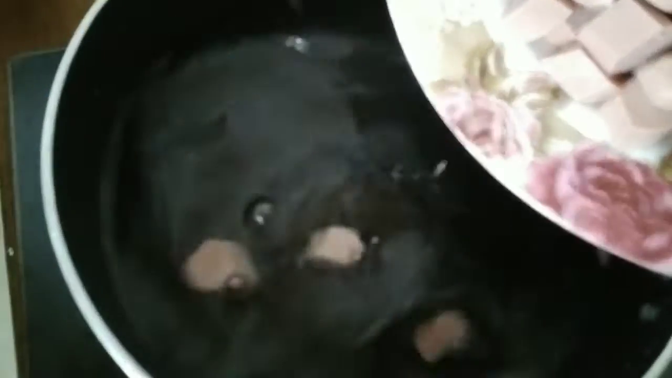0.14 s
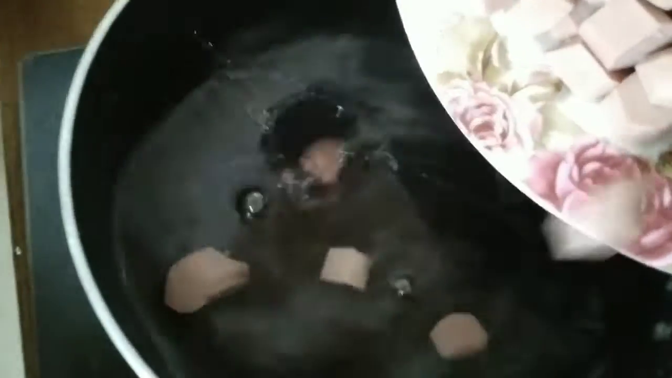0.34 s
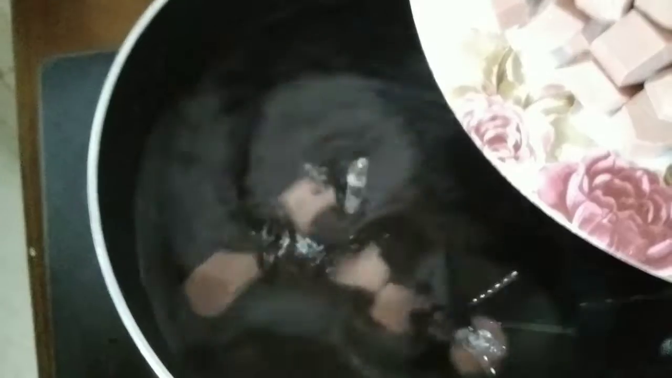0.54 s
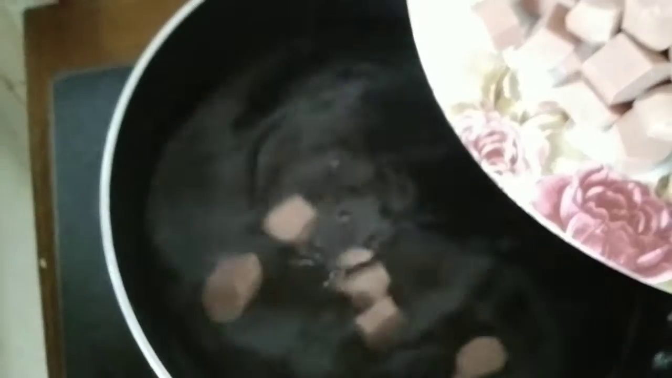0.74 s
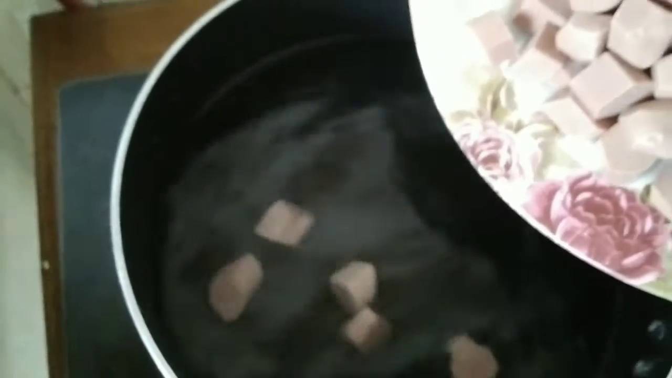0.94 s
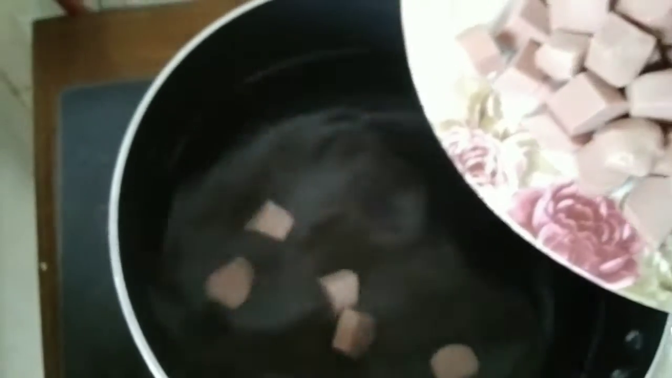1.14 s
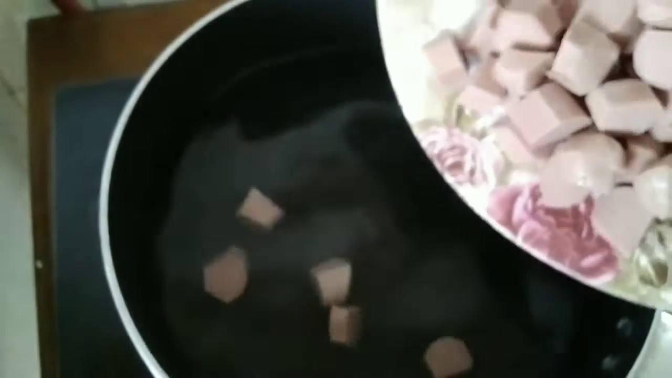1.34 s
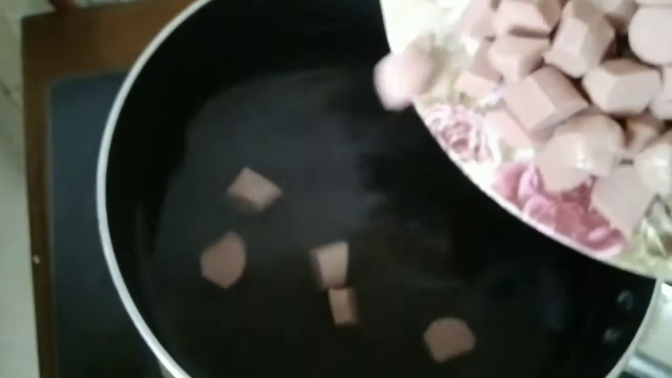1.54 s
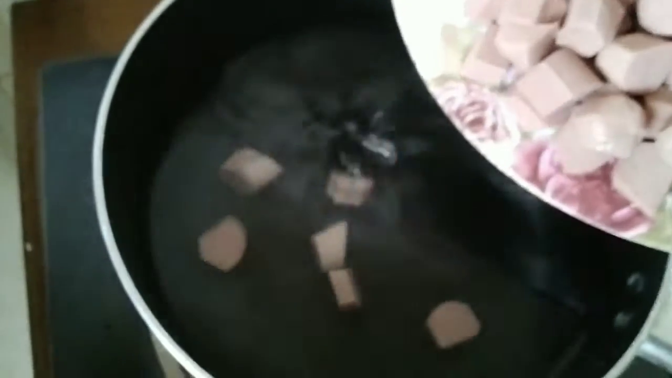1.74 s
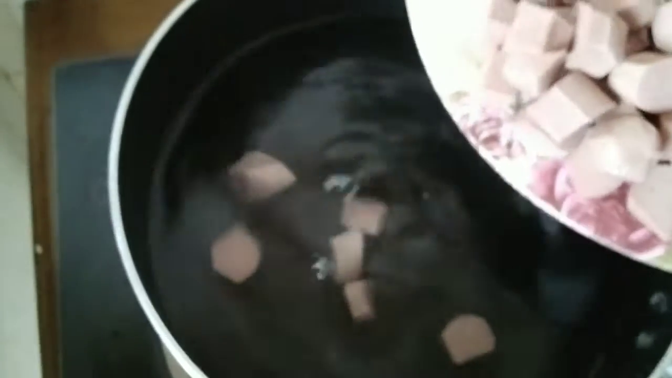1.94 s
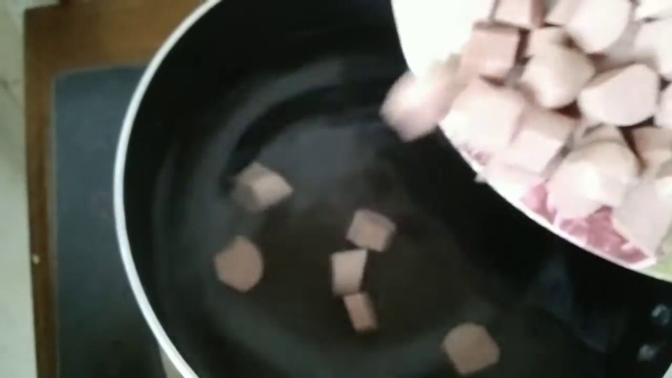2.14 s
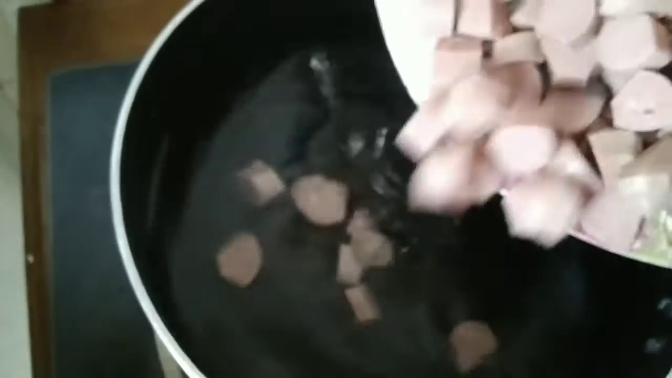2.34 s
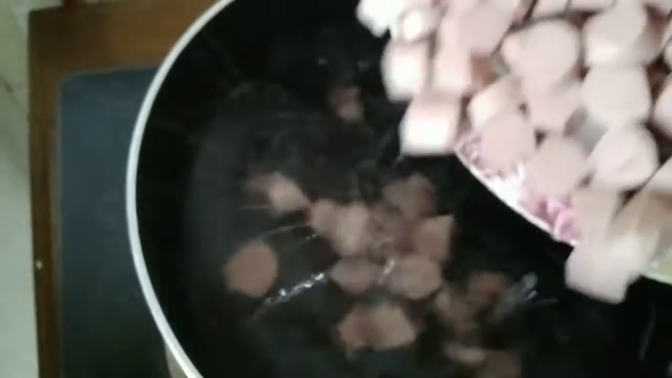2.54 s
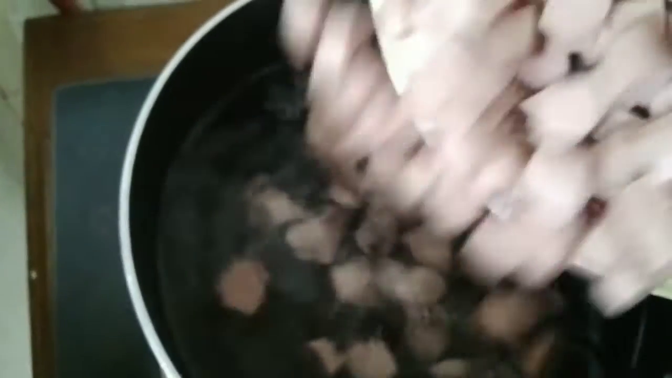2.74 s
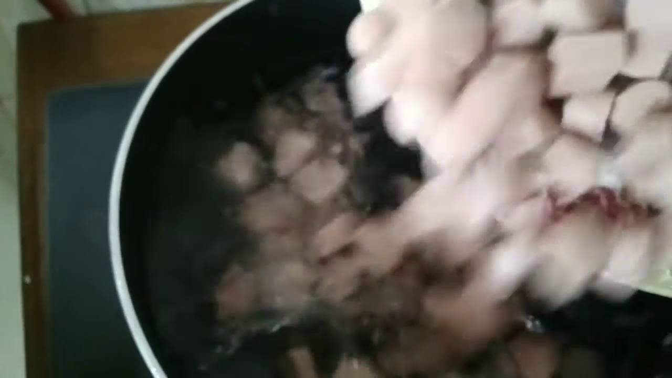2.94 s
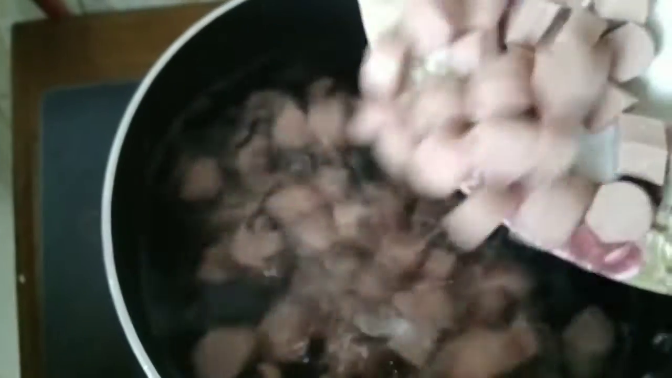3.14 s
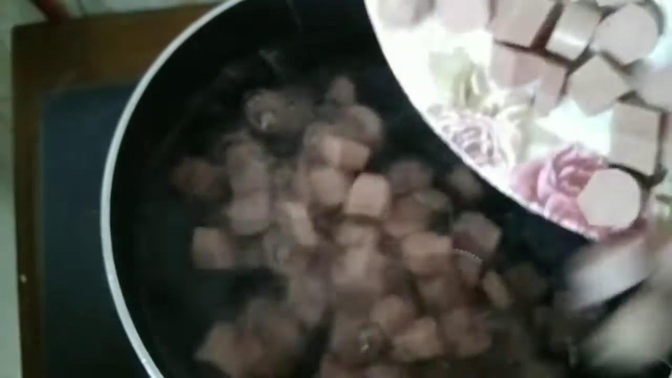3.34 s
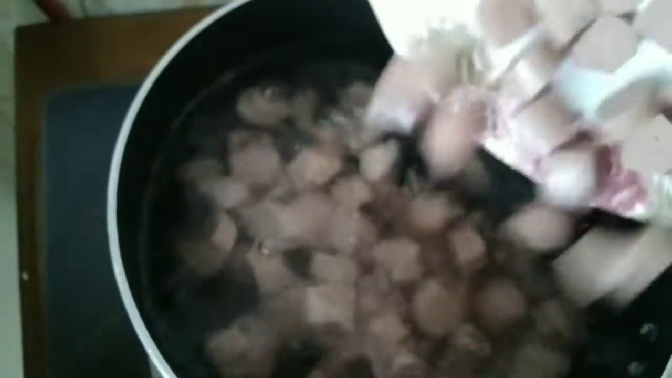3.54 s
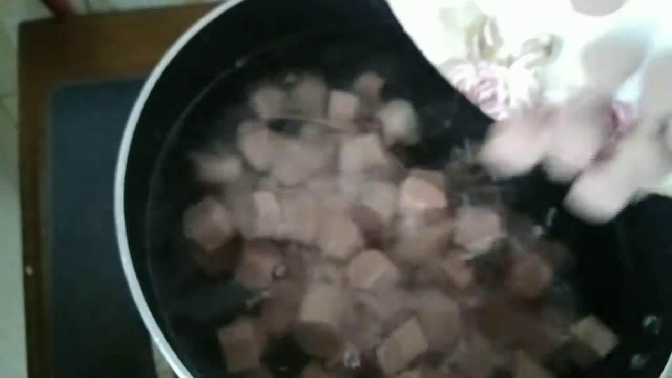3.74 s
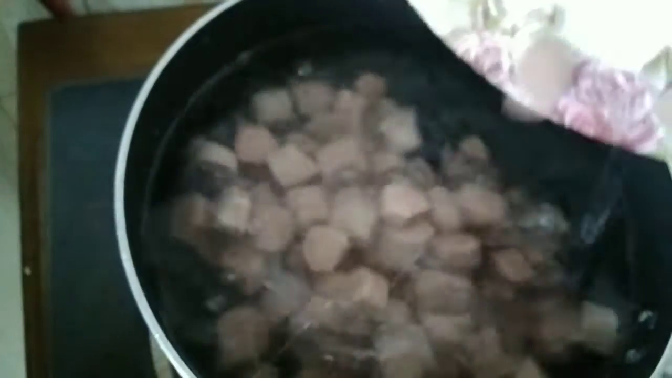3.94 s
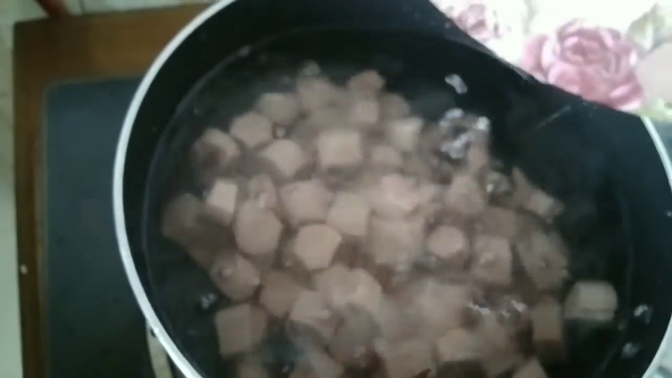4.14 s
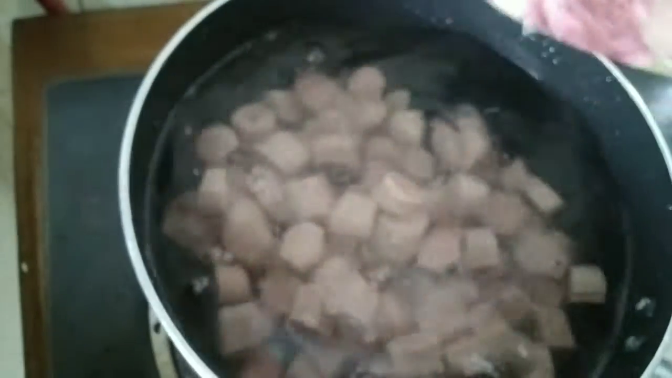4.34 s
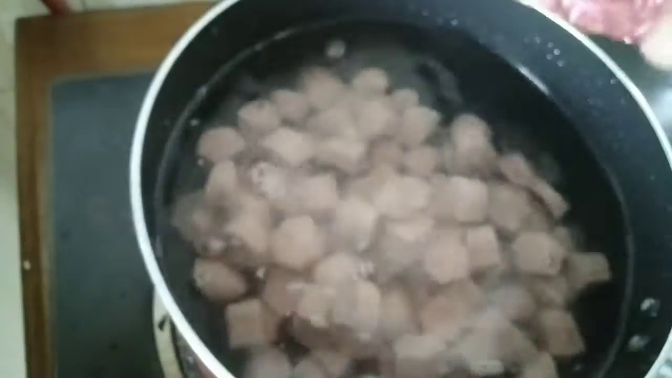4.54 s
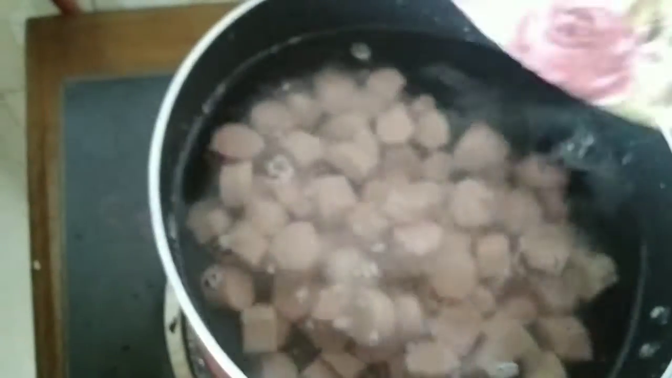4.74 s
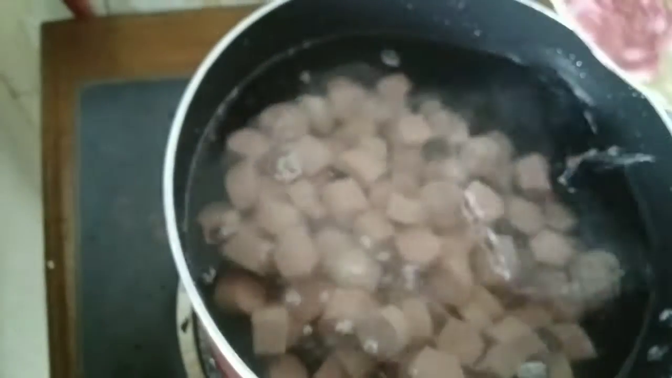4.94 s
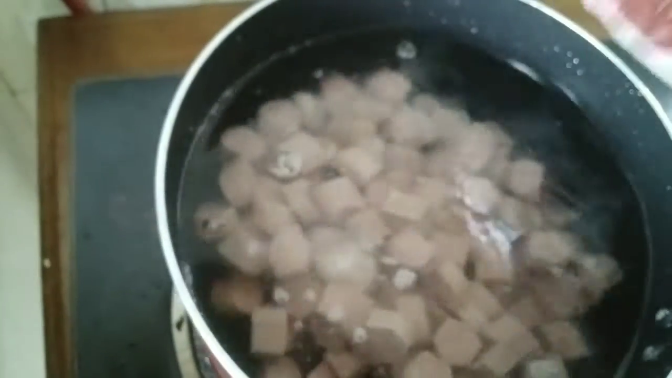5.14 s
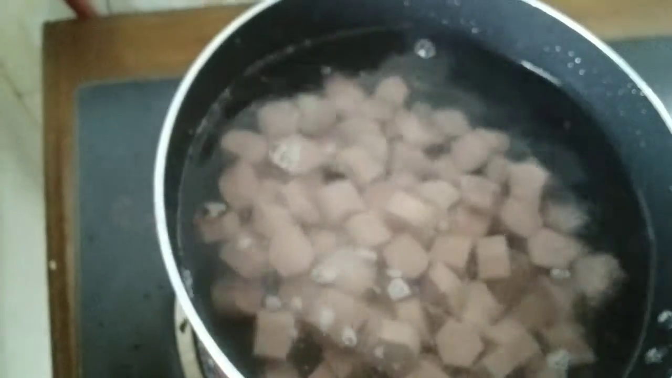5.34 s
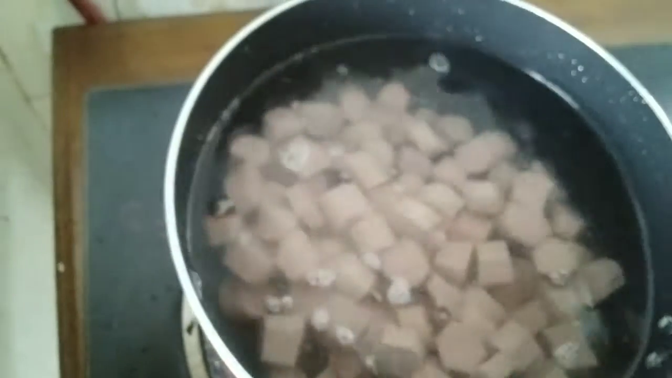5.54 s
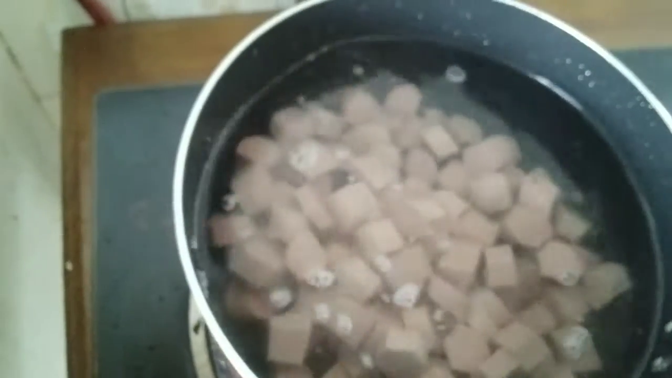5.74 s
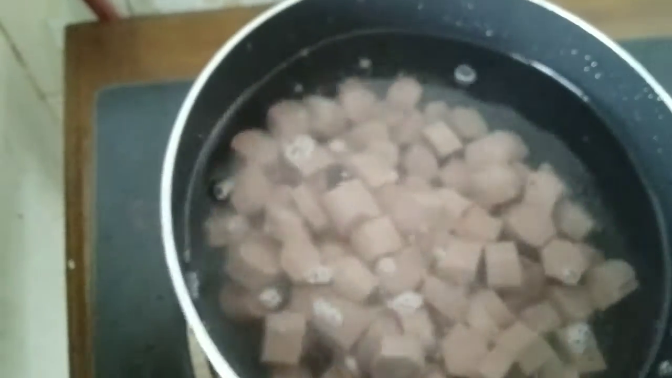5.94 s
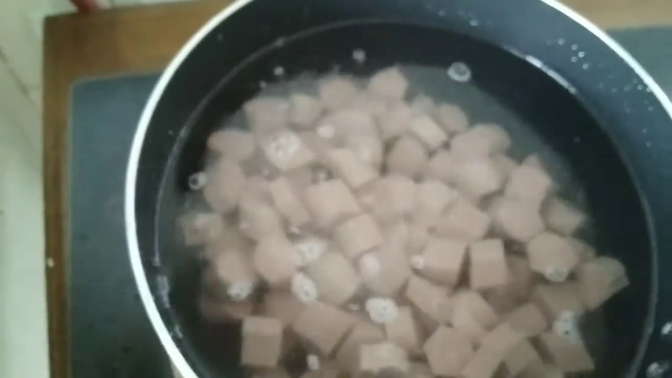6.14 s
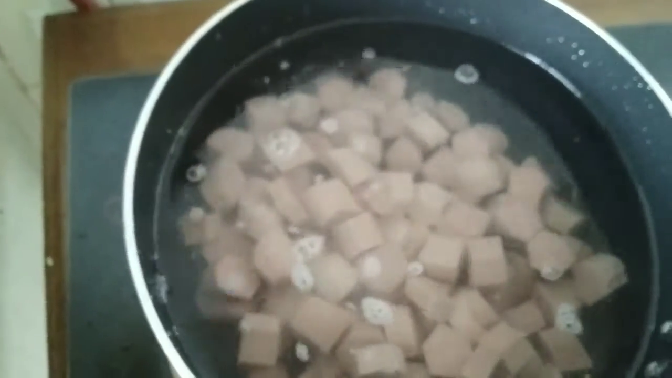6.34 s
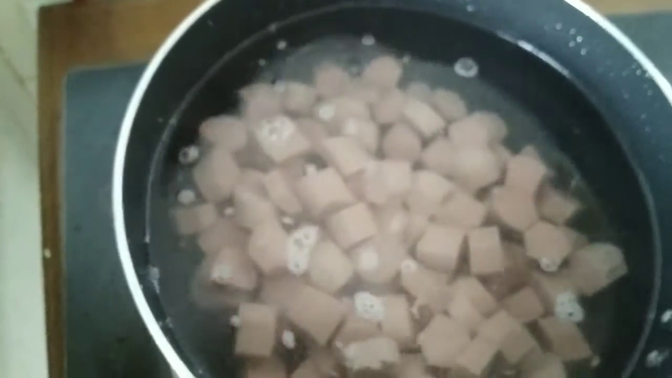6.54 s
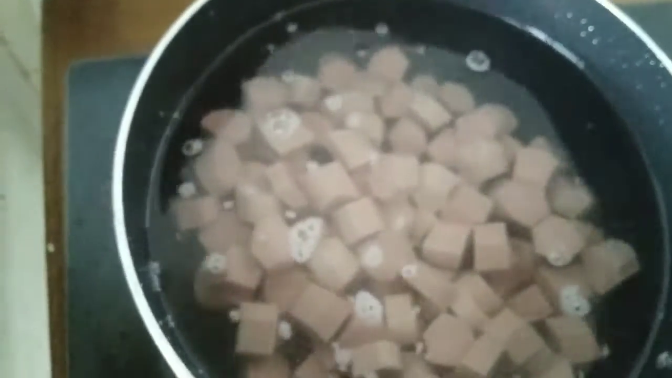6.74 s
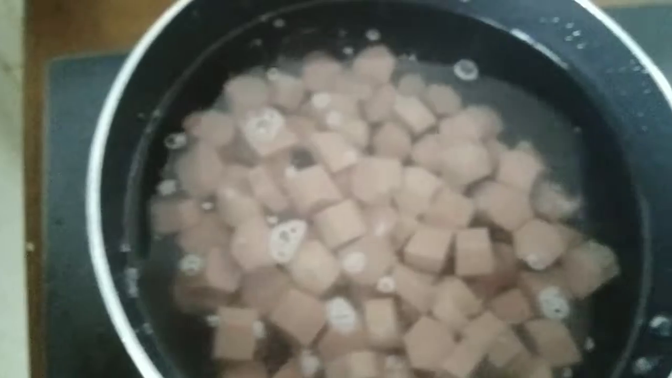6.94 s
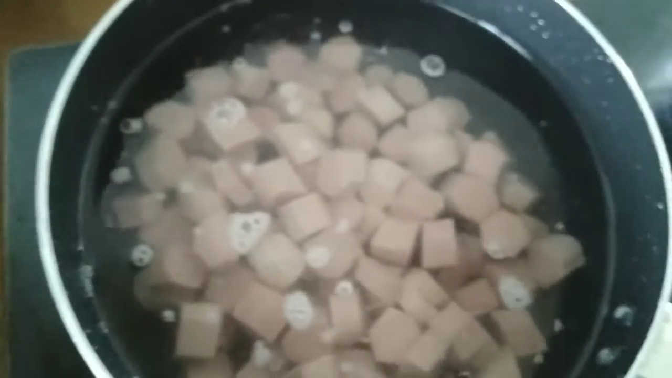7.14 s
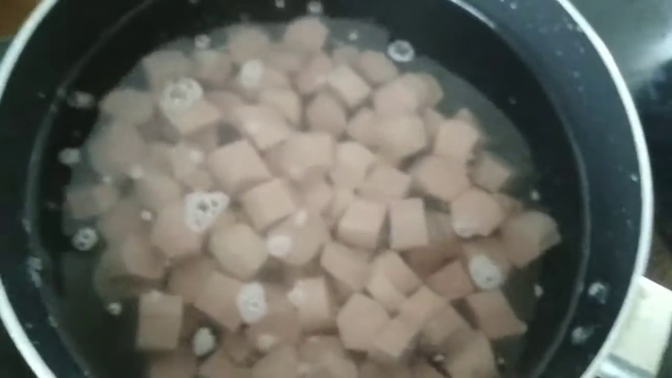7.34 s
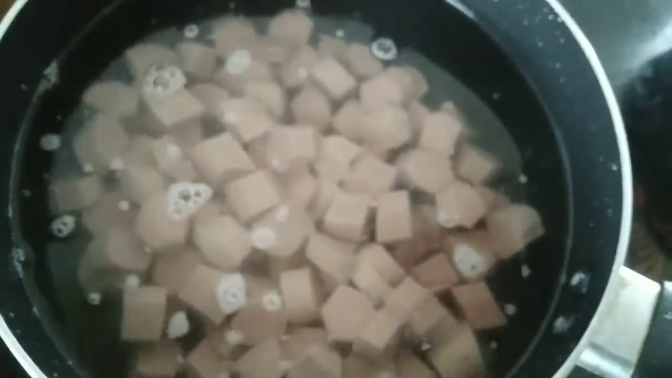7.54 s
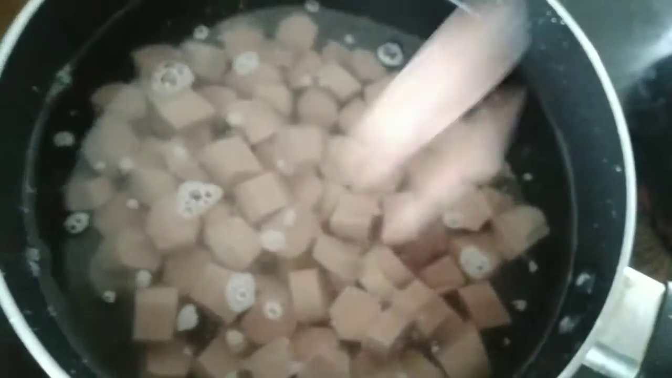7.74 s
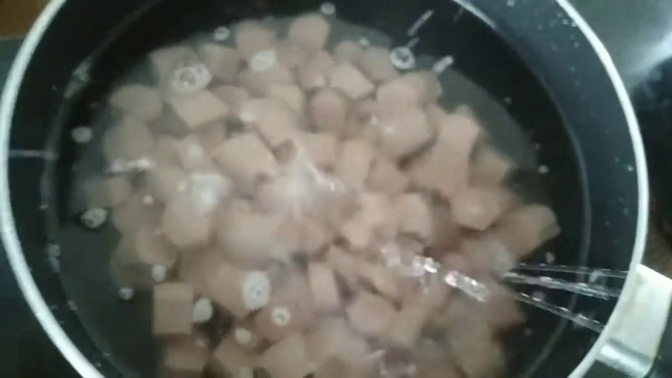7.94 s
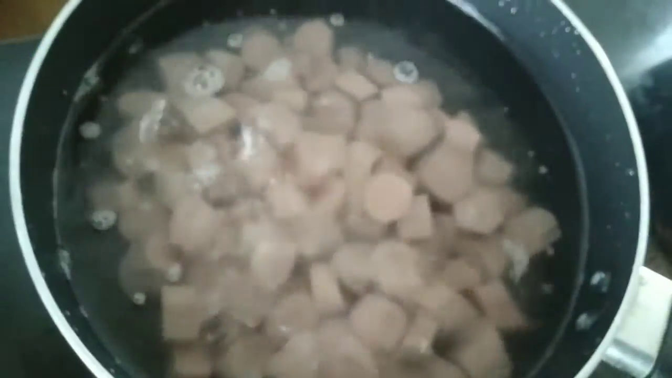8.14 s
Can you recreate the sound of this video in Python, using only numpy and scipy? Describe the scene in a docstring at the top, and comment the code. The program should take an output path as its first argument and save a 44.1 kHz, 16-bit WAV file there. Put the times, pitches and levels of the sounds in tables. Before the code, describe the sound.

In a small, hard kitchen, close to a phone, a few pieces of sausage slap into a pot of water with short plops. Then a heap tumbles in with dense splashes, fizzing spray, gurgles, low pot bumps and quick plate scrapes. After a pause the plate lands with a loud ringing, rattling clatter; light rustles, small drops and laps follow over faint hum.

```python
"""Pieces of sausage slide off a plate into a pot of water in a small hard kitchen, close to a phone.
First a few pieces slap the water, as bursts of noise, and trapped air rings as short rising tones.
From about 2 s a heap slides in: dense slaps, ticking spray, gurgles, bumps and scraping strokes.
At 5.5 s the plate is set down with a ringing clatter; a few last drops and small waves follow.
The room rings on after hits, over rustles, squeaks, hoots and hum; the phone turns down steady noise."""
import sys
import numpy as np
from scipy import signal
from scipy.fft import rfft, irfft
from scipy.io import wavfile
from scipy.ndimage import uniform_filter1d, minimum_filter1d

SR = 44100
rng = np.random.default_rng(int(sys.argv[2]) if len(sys.argv) > 2 else 0)


def waveform_to_disk(signal):
    """Save audio, clipped to [-1, 1], as 16-bit WAV at the path in sys.argv[1]."""
    frames = np.transpose(np.atleast_2d(signal))
    scaled = np.clip(frames, -1, 1) * 32767
    samples = np.round(scaled).astype(np.int16)
    wavfile.write(sys.argv[1], SR, samples)


N = 365148  # length in samples

# In all tables, t60 is the time in which a sound dies away by 60 dB.
# steady room noise: (frequency [Hz], relative level [dB])
FLOOR_SPECTRUM = [(15, -33), (25, -28), (59, 1), (183, 1.5), (221, -10.5), (305, -6.5), (368, -11.5),
                  (399, -9), (804, -10.5), (997, -14), (1710, -18), (2850, -27), (5430, -30.5), (8810, -26),
                  (15500, -40.5)]
FLOOR_DB = -63  # level while the suppressor is closed
# mains hum: two tones that beat; levels while the suppressor is closed, the second relative to the first
HUM_HZ, HUM_DB, HUM_BEAT_HZ, HUM_LOUDEST_S, HUM_SECOND_DB = 50.3, -73, .49, 3.95, -5
# the hum swells once: (time [s], level with the suppressor closed [dB], hold [s])
HUM_SWELL = [(1.5, -63, 0.08)]
# the room's tail by band: (frequency [Hz], relative level [dB], t60 [s])
ROOM_BANDS = [(100, -4, 0.57), (430, -6.5, 0.69), (1200, -12.5, .55), (2620, -3.5, 0.62), (4000, -8, 0.4),
              (5090, -13, 0.62), (8500, -4.5, 0.27), (11300, -8.5, 0.36), (15270, -4.5, .3)]
# tone colour of the water sound sent into the room: (frequency [Hz], gain [dB])
WATER_TO_ROOM = [(1800, -3.5), (2600, -10.5), (4700, -7), (5200, 3), (11000, 2.5), (15000, -9)]
RING_IN_ROOM_DB = -8.5  # the ring carries less into the room than the crack
# faint hoots, a narrow wavering band:
# (time [s], level [dB], hold [s], first pitch [Hz], last pitch [Hz], waver speed [Hz])
HOOTS = [(1.586, -53, 0.097, 870, 887, 110.4), (4.388, -53.5, .1, 901.6, 1295, 457.4)]
# soft hisses nearby: (time [s], level [dB], hold [s], lower part above level [dB], top above level [dB])
RUSTLES = [(4.44, -60.5, .16, -0.5, -9), (6.583, -53, 0.015, -9.5, -25), (6.682, -55.5, 0.065, -13.5, -14),
           (7.188, -50, 0.088, -6.5, -9.5)]
# tone colour of a rustle: (frequency [Hz], gain [dB])
RUSTLE_SPECTRUM = [(1300, -26.5), (1700, 3), (4700, -4.5), (5200, 0.5), (7000, -3), (8300, 5), (9500, -0.5),
                   (10000, 0), (15500, -16.5)]
# faint thin squeaks: (time [s], level [dB], hold [s])
SQUEAKS = [(1.635, -56.5, 0.1), (5.03, -59, 0.02), (5.135, -66.5, .03)]
# narrow bands in a squeak: (frequency [Hz], width [Hz], relative level [dB])
SQUEAK_BANDS = [(1650, 250, -2.5), (3140, 1300, -12), (3720, 340, -3), (4547, 470, -4), (5220, 310, -4.5)]
# pieces bump the bottom of the pot: (time [s], level [dB], hold [s])
BUMPS = [(2.27, -65.5, 0.056), (2.42, -46, 0.1), (2.54, -49, 0.093), (2.9, -48.5, 0.014), (3.24, -48, .12),
         (3.58, -69, 0.014)]
# a lone wave laps the wall of the pot: (time [s], level [dB], hold [s])
LAPS = [(.12, -57.5, .02), (.385, -55.5, .02), (.83, -53.5, .04), (.96, -56, 0.034), (1.4, -51, .01),
        (2.01, -55, .02), (7.3, -62, .03), (7.7, -57.5, 0.022), (7.79, -59, 0.099), (8.08, -55.5, 0.087)]
# stirred water while the heap slides in: (time [s], fine spray level [dB], gurgle level [dB])
STIRRED_WATER = [(2.1, -74.5, -69), (2.27, -50, -63.5), (2.44, -53, -64), (2.52, -37, -57), (2.6, -45, -54),
                 (2.75, -47.5, -68.5), (2.91, -48, -57.5), (3.02, -57, -63), (3.29, -64, -56),
                 (3.37, -39.5, -51), (3.44, -60, -58.5), (3.6, -86, -54.5), (3.7, -90, -85)]
LARGE_POCKETS_DB = -3  # large air pockets above the small ones, in stirred water
# the last pieces are scraped off the plate in strokes:
# (time [s], level [dB], hold [s], upper part above the level [dB])
SCRAPES = [(3.131, -46.5, 0.017, 0), (3.172, -48, 0.045, -8), (3.24, -47, 0.047, -5.5),
           (3.334, -48, 0.033, 0), (3.445, -47.5, .01, -7), (3.468, -55.5, 0.0137, -2),
           (3.506, -53, 0.017, -9.5)]
# lower resonances of the loaded plate: (frequency [Hz], relative strength [dB], t60 [s])
SCRAPE_LOW = [(311, 4, 0.052), (689, 5, 0.028), (1230, -1.5, 0.029)]
# its upper resonances: (frequency [Hz], relative strength [dB], t60 [s])
SCRAPE_HIGH = [(1975, -3, 0.042), (2250, 5.5, 0.017), (2240, -17, 0.009)]
# the plate meets the worktop and rocks:
# (time [s], blow strength [dB], worktop thump above the blow, before its own gain [dB])
BLOWS = [(5.5198, 5.5, -25), (5.5519, 0, -23), (5.566, 0, -19.5), (5.5736, -5.5, -22.5), (5.5892, -4, -18),
         (5.664, -19.5, -10.5), (5.694, -8, -11.5), (5.6993, -8.5, -15), (5.7251, -12, -10.5),
         (5.7426, -17.5, -14), (5.805, -27.5, -9), (5.8618, -37, -2)]
# the plate chatters and grinds between blows: (time [s], strength before the gain of each path [dB])
CHATTER = [(5.519, -7.5), (5.523, -11), (5.547, -18), (5.565, -9), (5.651, -21), (5.689, -19), (5.699, -15),
           (5.9, -52.5)]
# ringing tones of the plate: (frequency [Hz], relative strength [dB], t60 [s])
PLATE_TONES = [(880, -16, .04), (1284, -4, .13), (1851, 0, .075), (2120, -6, .06), (2240, -9, .06),
               (2557, -14, .1), (2900, -14, .07), (3300, -7, .056), (3800, -10, .06), (4580, -5, .035),
               (5426, -17, .05), (6019, -20, .05), (6680, -19, .05), (7617, -21, .05)]
PLATE_RING_DB = -10  # push on the plate above the blow
# ringing tones of the worktop: (frequency [Hz], relative strength [dB], t60 [s])
WORKTOP_TONES = [(70, -8, .13), (121.9, -5.5, 0.12), (325.8, -19, 0.028), (361, -11.5, 0.23),
                 (475, -5, 0.069), (580.7, -14, 0.14), (697.7, -11, 0.021), (810, -2.5, 0.059)]
# air trapped behind a piece: (time [s], level before a shared gain [dB], starting pitch [Hz], t60 [s])
BUBBLES = [(0.121, -44.5, 445, 0.079), (2.011, -42, 450, 0.053), (0.122, -38, 1384, 0.027),
           (0.132, -34.5, 1600, 0.018), (0.389, -47.5, 650, 0.046), (0.869, -51, 595, 0.053),
           (1.394, -43, 2300, 0.031), (2.01, -33.5, 1264, 0.04), (2.039, -27.5, 1090, 0.013),
           (2.072, -32.5, 2260, 0.015), (2.231, -31, 2280, 0.014), (2.322, -33, 2420, 0.015),
           (2.455, -52.5, 2230, 0.037), (2.467, -33, 1540, 0.02), (2.493, -39, 1410, 0.033),
           (2.537, -28.5, 1010, 0.023), (2.554, -38, 654, 0.04), (2.586, -12.5, 903, 0.013),
           (2.613, -23.5, 747, 0.023), (2.634, -55, 840, 0.034), (2.661, -39.5, 1580, 0.028),
           (2.688, -42, 1600, 0.025), (2.711, -40, 1090, 0.035), (2.726, -43.5, 2240, 0.056),
           (2.785, -48, 1510, 0.04), (2.834, -35, 987, 0.044), (2.868, -42, 1530, 0.022),
           (2.886, -42.5, 1010, 0.033), (2.927, -54, 2370, 0.081), (3.1, -46, 2620, 0.036),
           (3.135, -43, 1400, 0.061), (3.149, -41, 726, 0.022), (3.173, -66, 640, 0.04),
           (3.339, -46.5, 1180, 0.061), (3.518, -42, 1970, 0.02), (3.58, -42.5, 647, 0.058),
           (3.601, -45, 943, 0.044), (3.699, -46, 1660, 0.034)]
# a piece or drop slaps the surface: (time [s], level of the whole slap [dB], centre of hiss [Hz],
# centre of middle [Hz], middle level within the slap [dB], plop level within the slap [dB])
SLAPS = [(0.0543, -31, 8140, 3850, -26, -43), (0.1184, -30.5, 5080, 2970, 1.5, -35),
         (0.1216, -10.5, 8730, 4100, -13.5, -27.5), (0.1307, -19, 8040, 3670, -28, -32),
         (0.1472, -30.5, 9890, 4590, -15, -16), (0.245, -27.5, 6900, 4190, -49, -44),
         (0.2544, -26.5, 10200, 4800, -49, -33), (1.3318, -35.5, 11700, 3880, -16, -25),
         (1.394, -32, 6600, 3130, -3, -44), (1.4012, -25, 8320, 2400, -34, -56),
         (2.0088, -22, 7540, 3700, -5.5, -5.5), (2.019, -33.5, 8000, 2660, -9, -31),
         (2.0717, -23.5, 7890, 2310, -29, -32), (2.172, -36, 11600, 1920, -14, -18),
         (2.2074, -28.5, 8460, 4590, -23, -41), (2.2303, -18, 7400, 2370, -31.5, -51),
         (2.2454, -17, 11000, 4570, -37, -47), (2.257, -25, 7200, 4590, -24.5, -38),
         (2.2664, -26, 8110, 4600, -35, -49), (2.2859, -14, 7210, 4430, -32, -52),
         (2.2997, -31.5, 9630, 4670, -29, -33), (2.3142, -28.5, 8840, 2470, -28, -19),
         (2.3224, -26.5, 8260, 2440, -24, -24), (2.4074, -27, 7040, 4500, -18, -31),
         (2.4558, -19.5, 8860, 4630, -31, -52), (2.4795, -22.5, 8020, 3330, -4.5, -33),
         (2.5056, -18.5, 8750, 4330, -28, -17), (2.5097, -11.5, 8130, 4350, -18, -40),
         (2.5379, -29.5, 8520, 4690, -23, -3), (2.5491, -18.5, 7460, 4800, -13, -26),
         (2.5624, -34, 8360, 4790, -8, -7), (2.583, -29.5, 8460, 2380, 3.5, -3),
         (2.586, -17, 6990, 4260, -3.5, -13), (2.6184, -22, 6780, 4300, -1.5, -15),
         (2.6803, -23.5, 8090, 4610, -20, -50), (2.7236, -22.5, 6240, 2350, -6, -18),
         (2.7456, -20.5, 8710, 4500, -8.5, -28), (2.7741, -32, 6440, 4740, -12, -21),
         (2.7802, -22.5, 8600, 2640, -23, -21.5), (2.798, -32, 8170, 2400, -12, -17),
         (2.8346, -29.5, 7620, 4270, -11.5, -6), (2.8675, -23, 7810, 1900, -31, -42),
         (2.8819, -26.5, 7200, 3200, -21.5, -23.5), (2.9083, -24.5, 8500, 3910, -32, -27),
         (2.9252, -27, 6890, 2450, -25, -19.5), (3.0113, -34, 9350, 4640, -28, -31),
         (3.025, -36, 8380, 4250, -14, -30), (3.1043, -37.5, 6210, 3200, 9.5, -38),
         (3.1187, -40.5, 5360, 4640, 16, -66), (3.1353, -24.5, 7620, 2510, -6, -17),
         (3.1725, -25.5, 6790, 2120, -19, -26), (3.214, -29, 7780, 1950, -43, -35),
         (3.2684, -25.5, 6050, 2300, -27, -32), (3.274, -26.5, 9360, 2430, -28, -28),
         (3.304, -25.5, 8210, 2400, -15, -42), (3.3225, -22.5, 8320, 4820, -1, -47),
         (3.3384, -17.5, 8300, 2440, -18, -16.5), (3.3722, -20, 8100, 4600, -20, -45),
         (3.3788, -26.5, 5300, 4600, -41, -28), (3.4222, -27, 7060, 1980, -55, -33),
         (3.5464, -44.5, 5370, 4030, 6.5, -25), (3.5667, -40.5, 5460, 4050, 4, -34),
         (3.5895, -13, 7660, 4520, -15.5, -45), (3.6014, -20.5, 11500, 4670, -11.5, -17.5),
         (3.724, -33, 6070, 4800, -42, -33), (3.742, -31, 8300, 4350, -35, -38),
         (3.8587, -35.5, 9830, 1960, -37, -30), (4.3443, -24.5, 6920, 4070, -22, -29),
         (4.4059, -27.5, 7080, 4320, -2, -24), (4.42, -23, 7200, 2770, -1.5, -28.5),
         (6.5894, -35, 6300, 2590, -12.5, -34), (6.7107, -37, 7970, 4270, -18, -27),
         (7.476, -50, 8400, 1933, 5, -10), (7.4959, -33, 7970, 4240, -14.5, -38),
         (7.5116, -41, 6910, 3350, 3, -31), (7.5241, -19.5, 5820, 3470, -3, -59),
         (7.563, -37, 5530, 3360, -33, -24), (7.6071, -36, 7530, 4100, -26, -28),
         (7.7517, -34, 7930, 2070, -39, -29), (7.7737, -37, 8490, 2120, -36, -26)]
# edges of the suppressor's bands: (frequency [Hz])
GATE_EDGES_HZ = [0, 250, 600, 1100, 1700, 2600, 3700, 5000, 6200, 7700, 9600, 12000, 16000]
GATE_DEPTH_DB, GATE_OPEN_DB, GATE_KNEE_DB, GATE_HOLD_S = 10, 6, 8.5, 0.04
TOP_HZ = 15600  # the phone cuts the treble above this


def undb(db):
    """Turns decibels into a plain multiplier."""
    return 10 ** (np.asarray(db) / 20)


def level(x, db):
    """Scales a signal so that its average (RMS) strength is the given level."""
    return x * undb(db) / np.sqrt(np.mean(x ** 2))


def colour(x, hz, db):
    """Shapes a signal by a spectrum joined on a log-frequency axis."""
    f = np.maximum(np.arange(len(x) // 2 + 1) * SR / len(x), 1)
    gain = undb(np.interp(np.log(f), np.log(hz), db))
    return irfft(rfft(x) * gain, len(x))


def curve(rows, column=1):
    """Gain over time joined between rows in dB; practically silent outside them."""
    rows = np.array(rows)
    return undb(np.interp(np.arange(N) / SR, rows[:, 0], rows[:, column], -150, -150))


def swells(rows, attack_s, t60):
    """Gain over time: each row rises, holds and dies away."""
    t, out = np.arange(N) / SR, 0
    for s, db, hold in rows:
        fall = np.exp(-np.log(1000) * np.maximum(t - s - attack_s - hold, 0) / t60)
        out = out + undb(db) * np.clip((t - s) / attack_s, 0, 1) * fall
    return out


def add(out, s, sound):
    """Places a short sound at a time in seconds."""
    i = int(s * SR)
    out[i:i + len(sound)] += sound[:N - i]


def ring(x, modes):
    """Lets a signal strike a set of tones that each die away."""
    out = 0
    for hz, db, t60 in modes:
        pole = np.exp(2j * np.pi * hz / SR - np.log(1000) / (t60 * SR))
        out = out + undb(db) * signal.lfilter([1], [1, -pole], x).imag
    return out


def grains(rate, scatter_db):
    """Random clicks of very uneven size, at an average rate per second."""
    size = np.minimum(rng.exponential(size=N), 3)
    happens = rng.random(N) < rate / SR
    return happens * undb(scatter_db * size) * rng.choice([-1, 1], N)


def floor():
    """Steady room noise and two mains hums whose close pitches make them beat slowly."""
    t = np.arange(N) / SR
    noise = level(colour(rng.standard_normal(N), *np.transpose(FLOOR_SPECTRUM)), FLOOR_DB)
    pair = 1 + undb(HUM_SECOND_DB) * np.exp(2j * np.pi * HUM_BEAT_HZ * (t - HUM_LOUDEST_S))
    strength = undb(HUM_DB) * pair + swells(HUM_SWELL, 0.072, 1.1)
    hum = (strength * np.exp(2j * np.pi * HUM_HZ * t)).imag
    # raised here by as much as the closed suppressor later takes away
    return undb(GATE_DEPTH_DB) * (noise + np.sqrt(2) * hum)


def kitchen(x, gap_ms=4.5):
    """The room's tail: overlapping bands of noise, each dying at its own rate."""
    hz, db, t60 = np.transpose(ROOM_BANDS)
    t, tail = np.arange(SR) / SR, 0
    spectrum = rfft(rng.standard_normal(SR))
    place = np.log(np.arange(SR // 2 + 1) + 1.)
    for k in range(len(hz)):
        share = np.interp(place, np.log(hz), np.arange(len(hz)) == k)
        band = irfft(spectrum * share, SR)
        tail = tail + undb(db[k]) * band * np.exp(-np.log(1000) * t / t60[k])
    # silent for half the gap, then fades in over one gap
    tail = tail * np.clip(t * 1e3 / gap_ms - .5, 0, 1) * undb(-31.0)
    return signal.fftconvolve(x, tail)[:N]


def hoots(glide_s=0.1):
    """A gliding tone whose size and phase wander quickly, so that it smears into a band."""
    out = 0
    for s, db, hold, first_hz, last_hz, waver_hz in HOOTS:
        span = int(SR / waver_hz)
        hz = np.interp(np.arange(N) / SR, [s, s + glide_s], [first_hz, last_hz])
        a, b = (uniform_filter1d(uniform_filter1d(rng.standard_normal(N), span), span) for _ in range(2))
        phase = 2 * np.pi * np.cumsum(hz) / SR
        tone = level(a * np.sin(phase) + b * np.cos(phase), 0)
        out = out + tone * swells([(s, db, hold)], 0.057, .9)
    return out


def rustles():
    """Smooth bright hisses: shaped noise in three parts that swell and die away."""
    hiss = colour(rng.standard_normal(N), *np.transpose(RUSTLE_SPECTRUM))
    edges_hz = [4690, 5130, 9700, 9900]
    main = level(colour(hiss, edges_hz, [-40, 0, 0, -40]), 0)
    lower = level(colour(hiss, edges_hz, [0, -40, -40, -40]), 0)
    top = level(colour(hiss, edges_hz, [-40, -40, -40, 0]), 0)
    out = 0
    for s, db, hold, lower_db, top_db in RUSTLES:
        mix = main + undb(lower_db) * lower + undb(top_db) * top
        out = out + swells([(s, db, hold)], .012, .55) * mix
    return out


def squeaks():
    """Thin squeaks: noise rings several narrow bands, wider ones dying faster."""
    # the width term keeps narrow bands from coming out stronger
    modes = [(hz, db + 10 * np.log10(width), 2.4 / width) for hz, width, db in SQUEAK_BANDS]
    squeak = level(ring(rng.standard_normal(N), modes), 0)
    return squeak * swells(SQUEAKS, 0.03, .6)


def pot_bumps():
    """Pieces bump the pot's bottom: random clicks ring a few deep tones."""
    rumble = ring(grains(130, 3.2), [(75, 3.5, 0.075), (108.6, 3.5, 0.16), (159.9, -10, 0.19)])
    rumble = colour(rumble, [40, 70], [-20, 0])
    return level(rumble, 0) * swells(BUMPS, 0.013, 0.17)


def pockets(lo_hz, hi_hz, rate, cycles, count):
    """Air pockets of many sizes pop at random; the cycle count sets how long each rings."""
    pitches = lo_hz * (hi_hz / lo_hz) ** ((np.arange(count) + rng.random(count)) / count)
    return level(sum(ring(grains(rate, 2.9), [(hz, 0, cycles / hz)]) * np.sqrt(hz) for hz in pitches), 0)


def gurgles():
    """Large and small air pockets pop in stirred water; waves sound the large ones alone."""
    large = pockets(230., 950., 94, 5.3, count=6)
    small = pockets(850., 3600., 43, 25, count=10)
    stirred = curve(STIRRED_WATER, column=2)
    return large * (undb(LARGE_POCKETS_DB) * stirred + swells(LAPS, 0.0081, 0.091)) + small * stirred


def spray():
    """Dense droplets: random clicks ring very briefly in the treble."""
    ticks = ring(grains(2150, 2.5), [(6216, 3.5, 0.00035), (8540, 2.0, 0.00039), (12500, -13.0, 0.0011)])
    ticks = colour(ticks, [3500, 5200], [-18, 0])
    return level(ticks, 0) * curve(STIRRED_WATER)


def scrape():
    """Grit that sticks and slips, as random clicks, rings broad resonances of the loaded plate."""
    grit = grains(1200, 5.3)
    low = colour(level(ring(grit, SCRAPE_LOW), 0), [150, 250], [-20, 0])
    high = level(ring(grit, SCRAPE_HIGH), 0)
    out = 0
    for s, db, hold, upper_db in SCRAPES:
        out = out + swells([(s, db, hold)], 0.004, 0.067) * (low + undb(upper_db) * high)
    return out


def plate(contact_ms=0.035):
    """Half-sine pushes with a gritty crack ring the plate and thump the worktop."""
    push, thump, crack = np.zeros(N), np.zeros(N), np.zeros(N)
    t = np.arange(1024) / SR
    shape = np.sin(np.pi * np.minimum(t * 1e3 / contact_ms, 1))
    shape = shape / shape.sum()
    for s, db, thump_db in BLOWS:
        add(push, s, undb(db + PLATE_RING_DB) * shape)
        add(thump, s, undb(db + thump_db) * shape)
        add(crack, s, undb(db) * rng.standard_normal(1024) * np.exp(-t / 0.0055))
    chatter = level(grains(3000, 1.3), 0) * curve(CHATTER)
    crack = colour(undb(-6.0) * crack + undb(-3.5) * chatter, [100, 300, 700, 1500, 4000, 8000, 15000],
                   [-29.5, 6.0, 6, 5, -3, -4.5, -26.0])
    plate_ring = ring(push + undb(-41) * chatter, PLATE_TONES)
    worktop_ring = undb(4.0) * ring(thump + undb(-37.0) * chatter, WORKTOP_TONES)
    no_rumble = signal.butter(3, 52., "high", fs=SR, output="sos")
    return signal.sosfilt(no_rumble, plate_ring + worktop_ring), crack


def bubbles(glide=0.058):
    """Each bubble is a dying tone that rises while it nears the surface."""
    out, t = np.zeros(N), np.arange(6000) / SR
    for s, db, hz, t60 in BUBBLES:
        # the pitch climbs by the glide share of its start in each t60
        phase = 2 * np.pi * hz * (t + glide * t ** 2 / (2 * t60))
        fade = np.exp(-np.log(1000) * t / t60) * np.minimum(t / 0.0048, 1)
        add(out, s, undb(db + 7) * np.sin(phase) * fade)
    return out


def slaps(fall_ms=3.2, low_fall_ms=6.):
    """A burst of torn water as noise: hiss and middle die fast, the low plop a little slower."""
    out, t = np.zeros(N), np.arange(2048) / SR
    for s, db, hz, mid_hz, mid_db, low_db in SLAPS:
        noise = rng.standard_normal(2048)
        high = colour(noise, hz * np.array([.55, .72, 1, 1.3, 1.9]), [-22, -12.5, -0.5, -9.5, -15])
        mid = colour(noise, mid_hz * np.array([.55, .8, 1, 1.3, 1.9]), [-20.5, -7, -0.5, -11, -21.5])
        low = colour(noise, [300, 650, 1550, 2270], [-47.5, -6.0, 3, -40.5])
        burst = (level(high, -4.5) + level(mid, mid_db)) * np.exp(-t * 1e3 / fall_ms)
        burst = burst + level(low, low_db) * np.exp(-t * 1e3 / low_fall_ms)
        add(out, s, undb(db) * burst * np.minimum(t / 0.0018, 1))
    return out


def scene():
    """Mixes all sources; splashes and the plate's clatter also ring in the room."""
    water = slaps() + bubbles()
    rung, crack = plate()
    # the tail after a splash has its own tone colour
    water_sent = colour(water, *np.transpose(WATER_TO_ROOM))
    ring_sent = colour(rung, [150, 300], [-14, RING_IN_ROOM_DB])
    room = kitchen(water_sent + ring_sent + crack)
    background = floor() + hoots() + rustles() + squeaks()
    pot = pot_bumps() + gurgles() + spray()
    return (background + room + pot + scrape() + rung + crack + water)[None]


def suppressor(x):
    """Each band is turned down unless it stands clear of its own usual level."""
    f, _, z = signal.stft(x, SR, nperseg=512)
    hold = max(int(GATE_HOLD_S * SR / 256), 1)  # in steps of 256 samples
    for lo, hi in zip(GATE_EDGES_HZ, GATE_EDGES_HZ[1:]):
        band = (f >= lo) & (f < hi)
        power = uniform_filter1d(np.mean(np.abs(z[band]) ** 2, axis=0), 5)
        over_db = 10 * np.log10(power / np.percentile(power, 30))
        opened = np.clip((over_db - GATE_OPEN_DB) / GATE_KNEE_DB, 0, 1)
        # a running maximum holds the band open
        opened = -minimum_filter1d(-opened, hold, origin=(hold - 1) // 2)
        z[band] *= undb(GATE_DEPTH_DB * (uniform_filter1d(opened, 3) - 1))
    return signal.istft(z, SR, nperseg=512)[1][:N]


def record(dry):
    """The phone suppresses steady noise, rounds the loudest peaks and cuts the top."""
    clean = suppressor(dry[0])[None]
    rounded = np.tanh(1.2 * clean) / 1.2
    return signal.sosfilt(signal.ellip(8, .2, 70, TOP_HZ, fs=SR, output="sos"), rounded)


dry = scene()
out = record(dry)
waveform_to_disk(out)
```